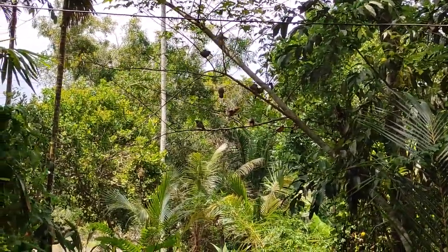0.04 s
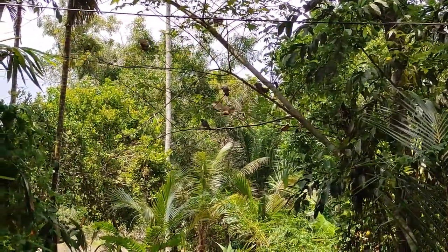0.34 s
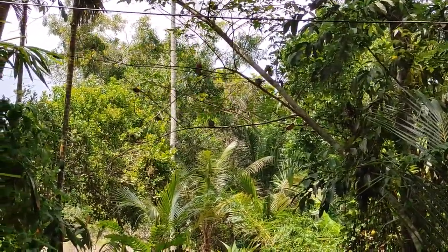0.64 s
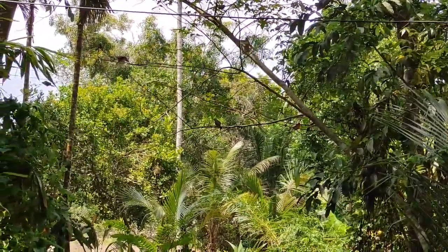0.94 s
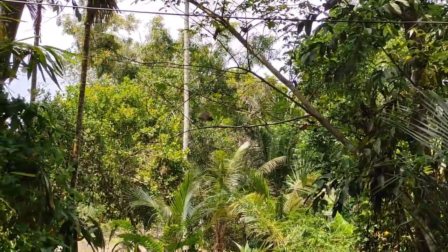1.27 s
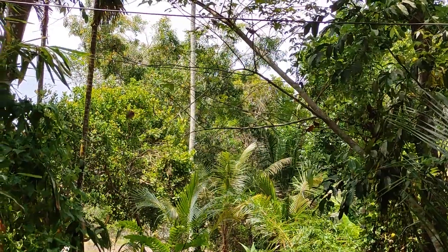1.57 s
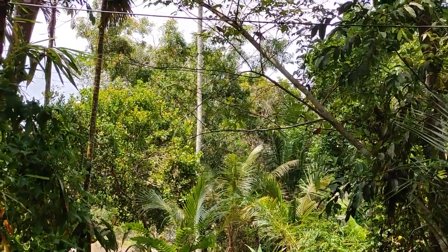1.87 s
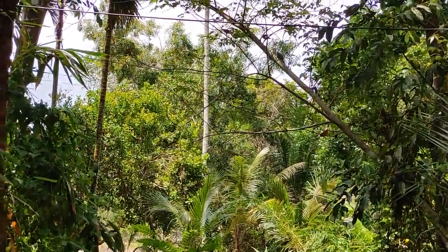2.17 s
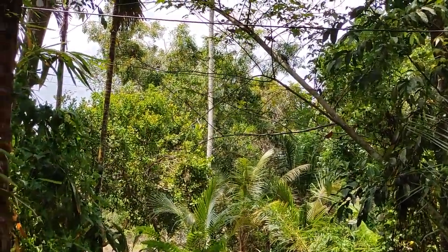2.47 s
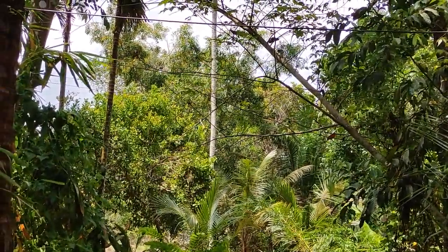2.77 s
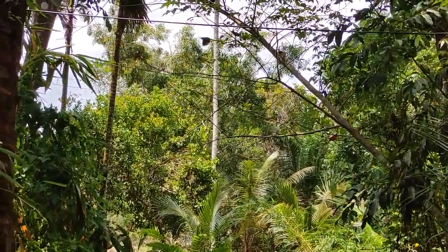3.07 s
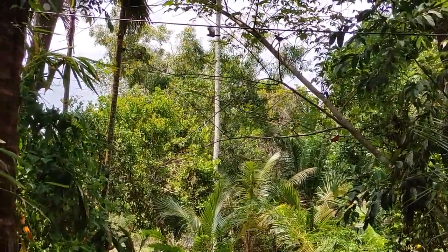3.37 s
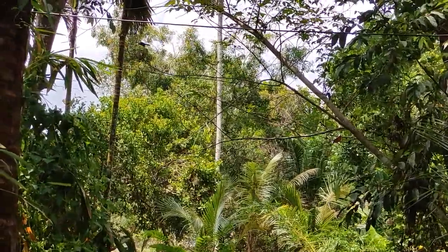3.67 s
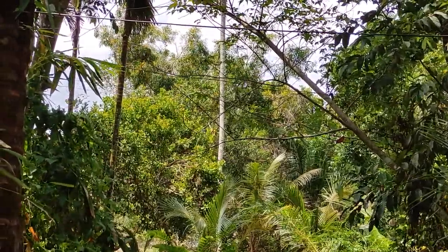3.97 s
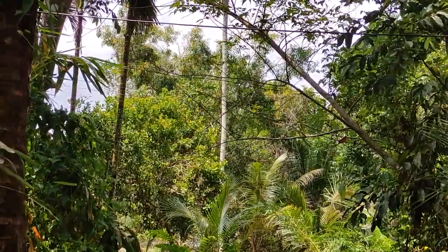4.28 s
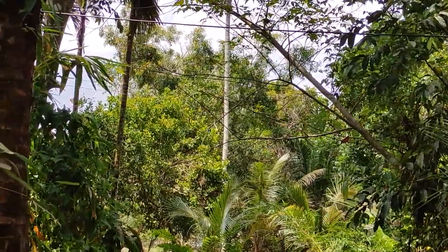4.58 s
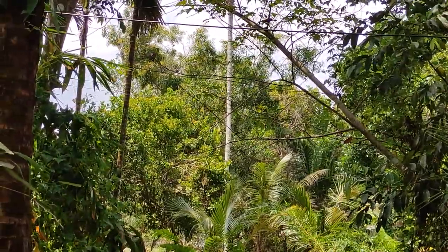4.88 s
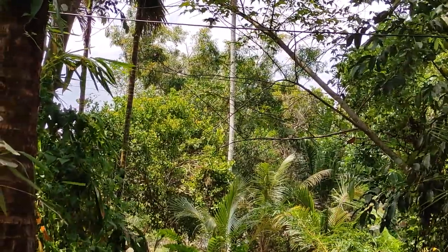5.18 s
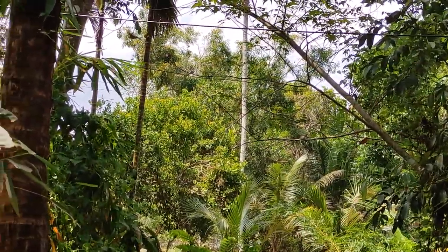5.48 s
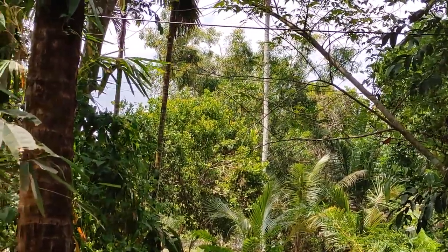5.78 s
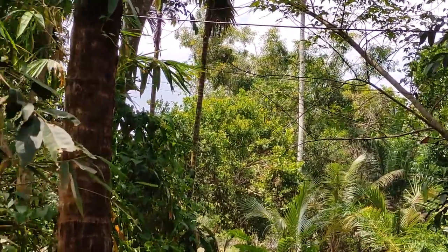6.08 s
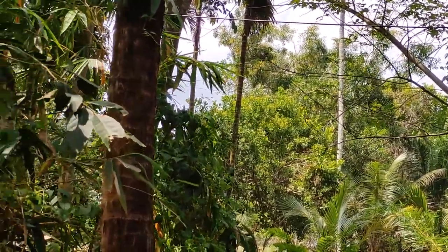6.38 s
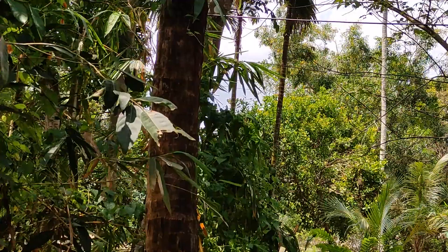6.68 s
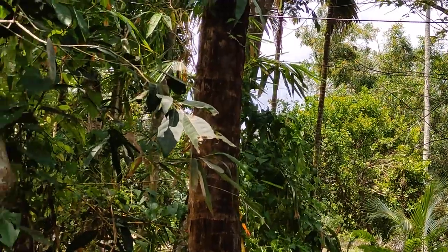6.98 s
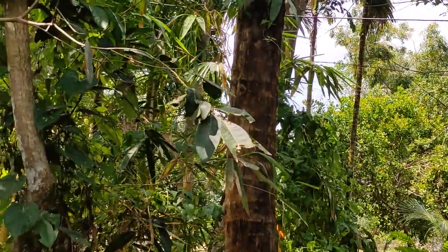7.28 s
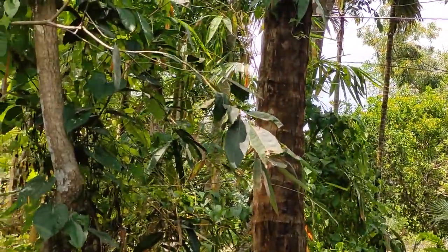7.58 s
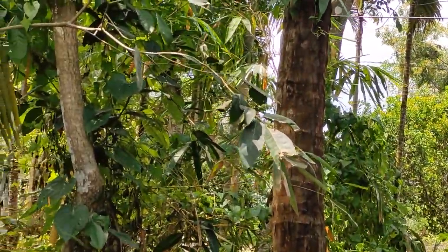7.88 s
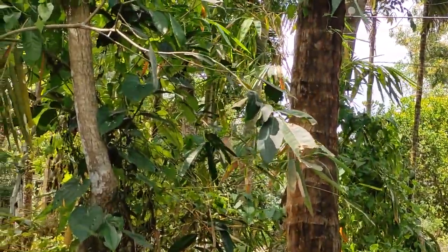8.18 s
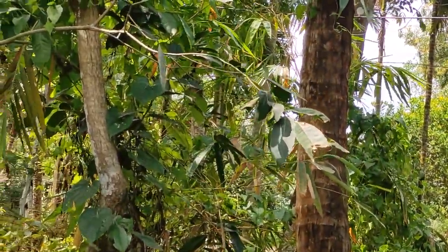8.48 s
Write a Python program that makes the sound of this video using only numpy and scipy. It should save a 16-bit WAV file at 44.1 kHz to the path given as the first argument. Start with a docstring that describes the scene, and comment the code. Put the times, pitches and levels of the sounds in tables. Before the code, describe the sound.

From the start, insects hiss steadily in tropical woodland over a low, distant rumble. A flock of birds squeals and chatters close to a hand-held phone, filling out within the first half second. Each call is a brief, rasping arch of pitch that plunges into a harsh chuck, and birds in trees further back merge into continuous chatter. A very faint, far motor hums underneath, mostly in the first three seconds. Around 2 seconds the flock starts to move off, and the calls become more scattered by trunks and leaves. At about 2.5 seconds there is one soft handling knock on the microphone. The chatter stays busy, with the close squeals growing sparser after 5 seconds. From about 7.5 seconds the calls are lower, duller and fainter, while the insects carry on unchanged to the end at about 8.6 seconds.

```python
"""Tropical trees, a flock of babblers close by, taken on a hand-held phone with two microphone ports.
From the start insects hiss over a low far rumble and a faint motor, and the birds squeal and chatter:
each call a rasping arch of pitch that plunges into a harsh chuck, scattered by trunks and leaves.
Around 2 s the phone turns away and the flock starts to move off; at 2.5 s the phone is bumped once.
Towards the end the calls come lower, duller and fainter, while the insects carry on."""
import sys
import numpy as np
from scipy import signal
from scipy.fft import rfft, irfft
from scipy.io import wavfile
from scipy.ndimage import uniform_filter1d, map_coordinates

SR = 44100
rng = np.random.default_rng(int(sys.argv[2]) if len(sys.argv) > 2 else 0)


def materialize(psi):
    """Save the field psi as 16-bit PCM at rate SR to the path in sys.argv[1].

    A 1-D psi becomes a single channel; in a 2-D psi each row is a channel.
    """
    bounded = np.clip(np.atleast_2d(psi).T, -1, 1)
    quanta = np.round(bounded * 32767).astype(np.int16)
    wavfile.write(sys.argv[1], SR, quanta)


N = 381024
T = np.arange(N) / SR

# spectra of the far rumble and of the insects: frequency_hz, gain_db
RUMBLE_SPECTRUM = [(25, -42), (50, -13), (90, -3.5), (150, -1), (330, -3.5), (520, -8.5), (900, -8),
                   (1400, -11), (2500, -21)]
INSECT_SPECTRUM = [(1100, -27.5), (1700, -6.5), (2300, -1.5), (3000, -4), (3600, -2.5), (4200, 4.5),
                   (5000, -10), (6400, -7), (8400, -9.5), (10500, -10), (12000, -14), (15500, -40)]
# the far motor: time_s, level_db
MOTOR_LEVEL = [(0, -79), (1, -76), (1.8, -73.5), (2.5, -70), (3.3, -90), (5, -79)]
# syrinx harmonics, lowest first: gain_db
SYRINX_HARMONICS = [-2.3, 0.93, -0.84, 1, 0.93, -1.2]
# resonances of throat and beak: frequency_hz, gain_db
THROAT_RESPONSE = [(800, -16.5), (1050, -7), (1300, -9.5), (1650, -4), (2100, -9), (2700, 0), (3300, -3.5),
                   (4300, 2.5), (5300, 1.5), (6200, -1.5), (7500, -5.5), (11000, -14.5), (15500, -23)]
# the flock's typical top pitch sinks as it calms down: time_s, pitch_hz
TYPICAL_PITCH = [(0, 2400), (1.2, 2480), (2.8, 2370), (4.7, 2240), (6.3, 2250), (8.6, 2060)]
# leaves swallow the upper harmonics once the birds have flown: time_s, tilt_db_per_octave
LEAF_TILT = [(0, 1.5), (3.5, 1), (6.3, 0), (7.6, -2.5)]
# bearing as the flock flies and the phone turns: time_s, left_lead_ms, left_minus_right_db
BEARING = [(0, 0.03, -1), (1.7, 0.045, 1), (2.1, 0.2, 0), (5.8, 0.19, -1), (8.6, 0.0012, -2.5)]
# scatter grows as the flock moves off: time_s, scattered_over_direct_db
SCATTER = [(0, -4.5), (1.4, -4.5), (2.4, 1.5), (8.6, 2)]
# three trees further from the microphone: call_count, relative_level_db, extra_scatter_db
FAR_TREES = [(130, 1, 2.5), (210, 0, 6), (320, -2, 9)]
# how excited the far birds are: time_s, level_db
CHATTER_LEVEL = [(0.0, -47), (0.19, -52), (0.34, -37), (0.77, -38), (1.01, -34), (2.36, -33.5),
                 (2.69, -36.5), (3.06, -34), (3.9, -36), (4.09, -35), (4.96, -36.5), (5.7, -35.5),
                 (6.04, -36), (7.31, -36), (7.75, -42.5), (7.94, -41.5), (8.3, -44.5), (8.64, -42.5)]
# calls close to the microphone: start_s, arch_s, top_pitch_hz, level_db, extra_fundamental_db
NEAR_SQUEALS = [(0.086,0.016,2190,-44,2.5), (0.152,0.043,2610,-37,-1.5), (0.19,0.022,2317,-36.5,-4),
                (0.211,0.051,2373,-36.5,0), (0.309,0.037,2616,-40,-2.5), (0.377,0.05,2556,-32.5,-7),
                (0.405,0.016,2286,-32.5,0.5), (0.523,0.024,2125,-34,1), (0.628,0.027,1710,-41.5,1),
                (0.721,0.04,2533,-32,-7), (0.773,0.035,2480,-36.5,-4), (0.822,0.029,2505,-37,-2),
                (0.912,0.057,2770,-37,-6), (0.973,0.061,2720,-34.5,-7), (1.08,0.045,1750,-38,-3),
                (1.133,0.068,2865,-37.5,-6.5), (1.212,0.089,2813,-34,-6.5), (1.387,0.044,2304,-35,-4),
                (1.476,0.048,2660,-39,0.5), (1.575,0.025,2490,-34.5,-5), (1.735,0.02,1705,-36.5,-2),
                (1.77,0.03,2370,-33.5,-11), (1.915,0.057,2490,-36,-6), (1.972,0.038,2710,-44,1),
                (2.01,0.049,2763,-36.5,3), (2.052,0.039,2644,-33,-7), (2.115,0.04,2640,-38,4),
                (2.16,0.02,2400,-37,-6), (2.304,0.027,1677,-41.5,4), (2.399,0.04,2360,-37,-12),
                (2.611,0.053,2490,-36.5,-4), (2.817,0.06,2763,-35,-1), (2.935,0.067,2330,-36,-1),
                (3.026,0.037,2300,-36.5,-7), (3.085,0.04,2283,-40.5,1), (3.24,0.042,2274,-35.5,1.5),
                (3.285,0.063,2540,-42.5,8), (3.438,0.066,2695,-37,-3), (3.6,0.025,1637,-39,2.5),
                (3.675,0.044,2290,-42,0), (3.75,0.028,1732,-37.5,1.5), (3.945,0.032,2146,-34.5,-4),
                (4.03,0.043,2594,-36,-0.5), (4.11,0.028,1697,-39.5,6.5), (4.15,0.034,2080,-37,-5),
                (4.35,0.058,2250,-37,-16), (4.435,0.04,2480,-40,-10), (4.53,0.048,2105,-37.5,-8),
                (4.625,0.037,2280,-39,-12), (4.73,0.055,2410,-39,-14), (4.87,0.044,2195,-45,-11),
                (5.028,0.048,2360,-40.5,-1), (5.15,0.048,2616,-39.5,-7), (5.215,0.039,2684,-41,-1),
                (5.615,0.041,2276,-41,-11), (5.712,0.039,2227,-40,-4), (5.762,0.044,2400,-41,-9),
                (6.762,0.044,2820,-44,-1), (6.886,0.064,2293,-36.5,-3.5), (7.125,0.034,2233,-42.5,-1),
                (7.252,0.046,1934,-43.5,-10), (7.315,0.035,2670,-43,-4), (7.482,0.052,1896,-41,-10),
                (7.703,0.043,2072,-37.5,-9), (7.781,0.075,2113,-42.5,-6), (7.91,0.038,1877,-44.5,-13),
                (7.99,0.07,2344,-43.5,-8), (8.069,0.058,1782,-43.5,-13), (8.315,0.04,2080,-45.5,-1)]
# a calmer bird lets its call die before the plunge is over: time_s, plunge_end_gain_db
CHUCK_FADE = [(0, -14), (1.5, -11), (3.5, -9), (6.5, -15), (7.5, -28)]
# close chucks, the plunge with hardly any arch: start_s, level_db
NEAR_CHUCKS = [(0.46,-39.5), (0.592,-55), (0.79,-51), (0.843,-43), (1.19,-43), (1.547,-39.5), (1.604,-34),
               (1.701,-41), (1.87,-37.5), (2.19,-34.5), (2.655,-46), (2.76,-44), (2.901,-39), (3.137,-44),
               (3.413,-37.5), (3.877,-46), (5.598,-43), (6.045,-41)]
# modes of the phone's body: pitch_hz, level_db, t60_s
PHONE_MODES = [(404, -38, 0.032), (723, -40, 0.026), (1100, -46, 0.031)]
# colour of the two microphone ports: frequency_hz, left_db, right_db
PORT_RESPONSE = [(2530, 3, 3), (3400, 4, 3.5), (5170, 4, 0.5), (6820, 3.5, -2), (7060, 1, -17),
                 (8460, 9, -3), (9220, 4.5, -12), (10740, -10.5, 9.5), (11580, -4, 11), (11830, -4, 15),
                 (11950, 5, 10.5), (15500, -4, 6.5)]


def undb(db):
    """Decibels to gain."""
    return 10 ** (np.asarray(db) / 20)


def unit(x):
    """Scale to rms 1."""
    return x / np.sqrt(np.mean(x ** 2) + 1e-18)


def curve(rows, t, column=1):
    """One column of a time table at times t."""
    rows = np.array(rows)
    return np.interp(t, rows[:, 0], rows[:, column])


def response(rows, hz, column=1):
    """Gain of a frequency_hz, gain_db table at the given frequencies."""
    rows = np.array(rows)
    return undb(np.interp(np.log(hz + 1), np.log(rows[:, 0]), rows[:, column]))


def colour(x, rows, column=1):
    """Filter by a frequency_hz, gain_db table."""
    size = x.shape[-1]
    hz = np.arange(size // 2 + 1) * SR / size
    return irfft(rfft(x) * response(rows, hz, column), size)


def wander(rate, size):
    """A random drift of spread 1 that changes course `rate` times a second."""
    at = np.arange(size) * rate / SR
    knots = np.random.default_rng(rng.integers(2 ** 31)).standard_normal(int(at[-1]) + 2)
    return np.interp(at, np.arange(len(knots)), knots) / np.sqrt(2 / 3)


def decay(t, t60_s):
    """An envelope that falls 60 dB in t60_s."""
    return np.exp(-np.log(1000) * t / t60_s)


def add(track, start_s, sound):
    """Mix a sound into a track."""
    i = int(np.clip(start_s * SR, 0, N - 1))
    track[i:i + len(sound)] += sound[:N - i]


def rumble(level_db=-59):
    """Low noise from far off, partly shared by the two ports."""
    noise = rng.standard_normal((2, N)) + 0.82 * rng.standard_normal(N)
    return undb(level_db) * unit(colour(noise, RUMBLE_SPECTRUM))


def insects(level_db=-46.5):
    """Insects on all sides of the microphone merge into a shimmering hiss."""
    shimmer = undb(1.2 * wander(25, N))
    hiss = colour(rng.standard_normal((2, N)), INSECT_SPECTRUM)
    return undb(level_db) * unit(hiss * shimmer)


def motor(pitch_hz=92):
    """A motor a long way off: one faint, unsteady tone."""
    hz = pitch_hz * (1 + 0.039 * wander(7.1, N))
    return unit(np.sin(2 * np.pi * np.cumsum(hz) / SR)) * undb(curve(MOTOR_LEVEL, T))


def squeal(arch_s, top_hz, rasp, bright_db, throat_size=1, fundamental_db=0, treble_db=0,
           arch_depth=.16, plunge_s=.017, chuck_db=-7, hiss_db=-14):
    """One call: the pitch arches, then plunges over an octave as the syrinx breaks into a rough chuck."""
    size = int((arch_s + plunge_s) * SR)
    t = np.arange(size) / SR
    across = 2 * np.minimum(t / arch_s, 1) - 1  # -1 to 1 over the arch
    fall = np.maximum(t - arch_s, 0) / plunge_s  # 0 to 1 over the plunge
    bend = arch_depth / (1 + (arch_s / 0.1286) ** 4)  # long notes are held level
    hz = top_hz * (1 - bend * across ** 2) * np.exp(-.8 * fall ** 1.25)
    rough = rasp + .6 * np.sqrt(fall)
    jitter = (.075 * rough + .03 * fall) * wander(1800, size) + .008 * wander(130, size)
    phase = 2 * np.pi * np.cumsum(hz * (1 + jitter)) / SR
    # tilts per octave: a rough syrinx closes harder and brightens, the closing beak dulls the plunge
    edge_db = 4 * (rough - .4) + treble_db
    tilt_db = bright_db - 3.5 * fall
    voice = 0
    for k, db in enumerate(SYRINX_HARMONICS, 1):
        octaves = np.log2(k / 2)
        db = db + fundamental_db * (k == 1) + tilt_db * octaves
        if k > 2:
            flicker_db = 2.5 * wander(70, size)
            db = db + edge_db * octaves + flicker_db
        voice = voice + undb(db) * response(THROAT_RESPONSE, k * hz * throat_size) * np.sin(k * phase)
    # turbulent air, rich in treble, scratches through the same throat
    turbulence = np.diff(rng.standard_normal(size + 1))
    hiss = unit(colour(turbulence, THROAT_RESPONSE)) * rough * undb(hiss_db)
    attack = np.minimum(t / (.22 * arch_s), 1)
    release = undb(chuck_db * fall ** .75) * np.sqrt(np.clip(5 * (1 - fall), 0, 1))
    flutter = undb(3.5 * rough * wander(703, size) - 2 * rough)
    return (voice + hiss) * attack * release * flutter


def chatter(call_count, scold_share=.41, pitch_spread=.31, size_spread=.029):
    """The birds of one far tree mix brief squeals with shorter, lower, harsher scolds."""
    out = np.zeros(N)
    for k, (when, kind, long, high, loud, harsh, build) in enumerate(rng.random((call_count, 7))):
        time_s = (k + when) / call_count * N / SR
        hz = curve(TYPICAL_PITCH, time_s) * (1 + pitch_spread * (high - .5))
        rasp = .14 + .44 * harsh
        throat_size = 1 + size_spread * (2 * build - 1)  # a bigger bird has lower resonances
        voice = dict(bright_db=-1, throat_size=throat_size, fundamental_db=-1,
                     treble_db=curve(LEAF_TILT, time_s), arch_depth=.13, chuck_db=-15)
        if kind < scold_share:
            call = squeal(.008 + .014 * long, .88 * hz, rasp + .2, **voice)
        else:
            call = squeal(.022 + .04 * long, hz, rasp, **voice)
        add(out, time_s - .03, call * undb(5 * loud))
    return out


def through_trees(source, extra_scatter_db, spray_t60_s, tail_db, tail_t60_s=.7):
    """At the ports: direct sound, a spray of echoes off leaves and trunks, a faint tail from the wood."""
    t = np.arange(SR) / SR
    envelope = decay(t, spray_t60_s) + undb(tail_db) * decay(t, tail_t60_s)
    onset = 1 - np.exp(-t / 0.008)
    echoes = rng.standard_normal((2, SR)) ** 3 * envelope * onset  # cubed noise is spiky
    echoes /= np.sqrt(np.sum(echoes ** 2, axis=1, keepdims=True))
    right_delay_s = curve(BEARING, T) / 1000
    right = map_coordinates(source, [(T - right_delay_s) * SR], order=3)
    scattered = signal.fftconvolve(source[None], echoes, axes=1)[:, :N]
    scatter = undb(curve(SCATTER, T) + extra_scatter_db)
    return (np.array([source, right]) + scatter * scattered) / np.sqrt(1 + scatter ** 2)


def far_birds(smoothing_s=.071, trim_db=-1.31):
    """Three trees further off, each with its own echoes, evened out into a continuous chatter."""
    groups = np.array([chatter(count) * undb(db) for count, db, _ in FAR_TREES])
    power = np.sum(groups ** 2, axis=0)
    running_rms = np.sqrt(uniform_filter1d(power, int(smoothing_s * SR)) + 0.0086 * np.mean(power))
    gain = undb(curve(CHATTER_LEVEL, T) + trim_db) / running_rms
    return sum(through_trees(group * gain, extra_scatter_db, spray_t60_s=.18, tail_db=-14)
               for group, (_, _, extra_scatter_db) in zip(groups, FAR_TREES))


def near_birds():
    """Calls close to the microphone: the shorter and lower the note, the harsher and brighter."""
    out = np.zeros(N)
    for start_s, arch_s, top_hz, level_db, fundamental_db in NEAR_SQUEALS:
        halvings = np.log2(.043 / arch_s)  # against a typical arch of 43 ms
        octaves_down = np.log2(curve(TYPICAL_PITCH, start_s) / top_hz)
        rasp = .2 + .17 * halvings + .21 * octaves_down
        call = squeal(arch_s, top_hz, np.clip(rasp, .1, 1), bright_db=-5 + 7.5 * rasp,
                      fundamental_db=fundamental_db, treble_db=curve(LEAF_TILT, start_s),
                      chuck_db=curve(CHUCK_FADE, start_s), hiss_db=-3)
        add(out, start_s, undb(level_db) * unit(call))
    for start_s, level_db in NEAR_CHUCKS:
        chuck = squeal(arch_s=.008, top_hz=2200, rasp=.45, bright_db=-1.5)
        add(out, start_s, undb(level_db) * unit(chuck))
    return through_trees(out, extra_scatter_db=-1, spray_t60_s=.23, tail_db=-13)


def phone_bump(start_s=2.473, attack_s=.0012):
    """Handling noise: a soft knock rings briefly in the phone's body."""
    out = np.zeros(N)
    t = np.arange(SR // 10) / SR
    ring = sum(undb(db) * np.sin(2 * np.pi * hz * t) * decay(t, t60_s) for hz, db, t60_s in PHONE_MODES)
    add(out, start_s, ring * (1 - np.exp(-t / attack_s)))
    return out


def scene():
    """What reaches the phone: birds panned by their bearing, the background and the bump."""
    side_db = curve(BEARING, T, column=2) / 2
    birds = (near_birds() + far_birds()) * undb([side_db, -side_db])
    return birds + rumble() + insects() + motor() + phone_bump()


def record(dry):
    """The phone's microphones: each port has its own treble resonances; the top is cut at 15.5 kHz."""
    left = colour(dry[0], PORT_RESPONSE, column=1)
    right = colour(dry[1], PORT_RESPONSE, column=2)
    lowpass = signal.ellip(10, .2, 70, 15500, fs=SR, output="sos")
    return signal.sosfilt(lowpass, np.array([left, right]))


dry = scene()
out = record(dry)
materialize(out)
```